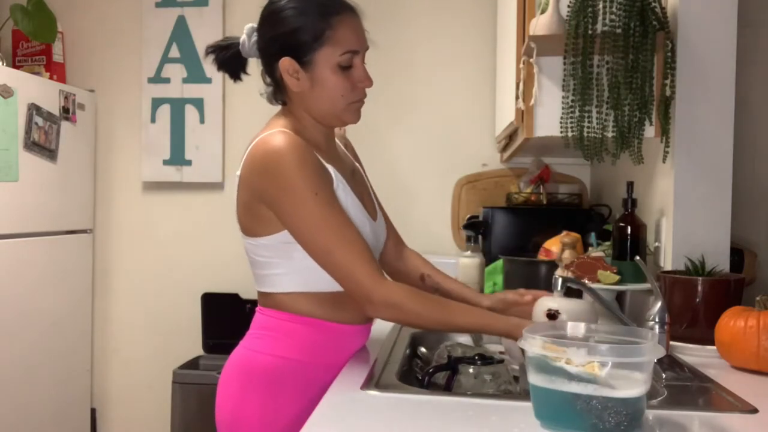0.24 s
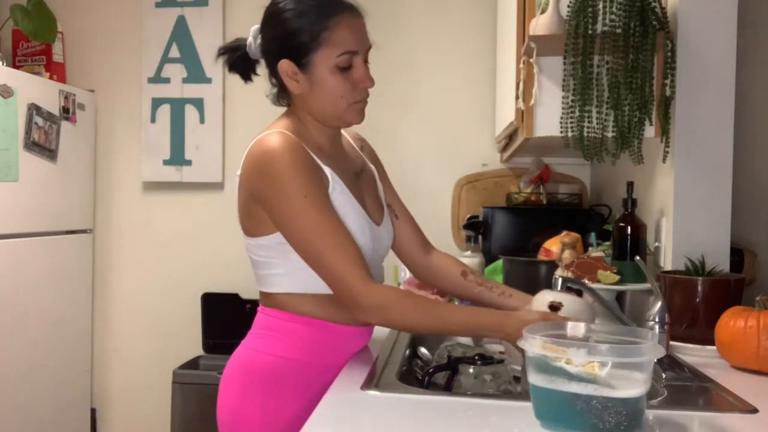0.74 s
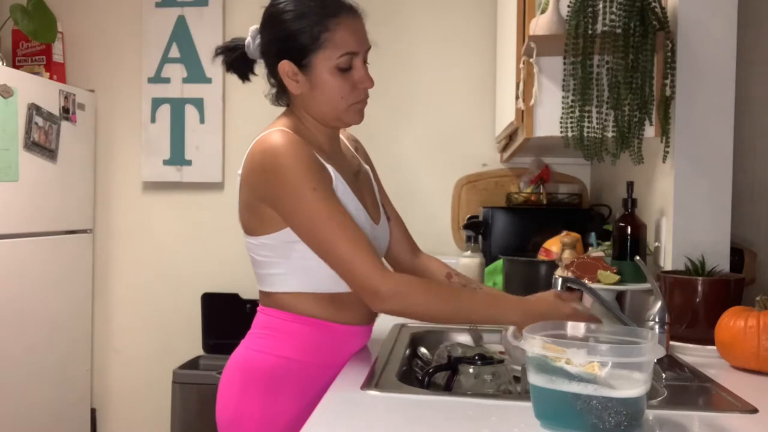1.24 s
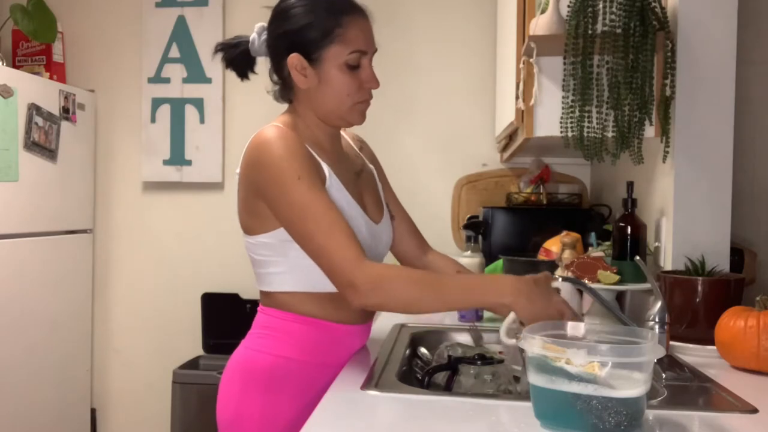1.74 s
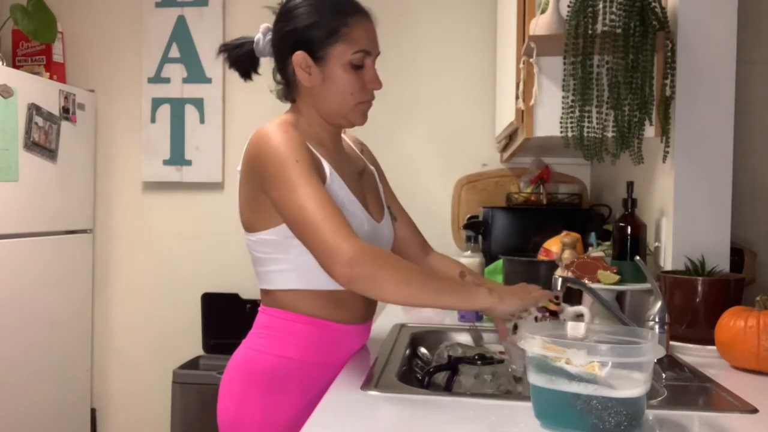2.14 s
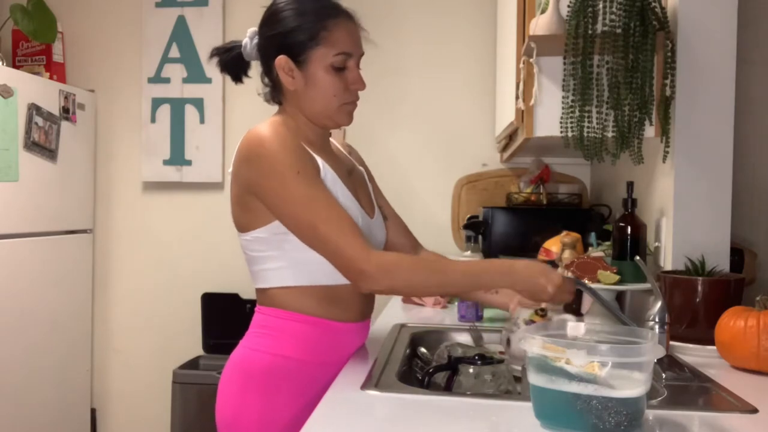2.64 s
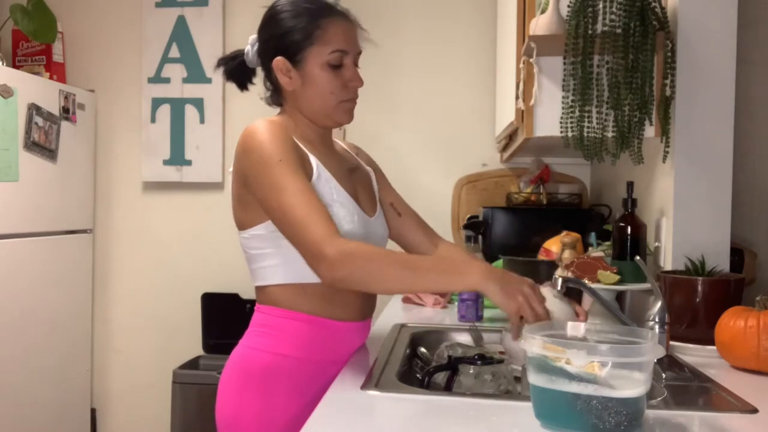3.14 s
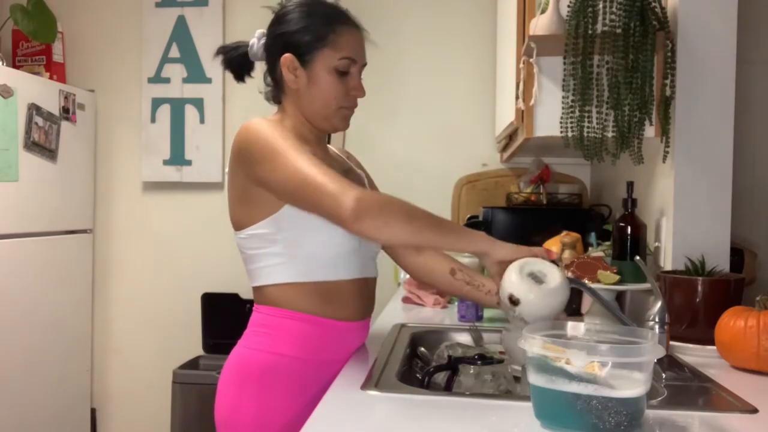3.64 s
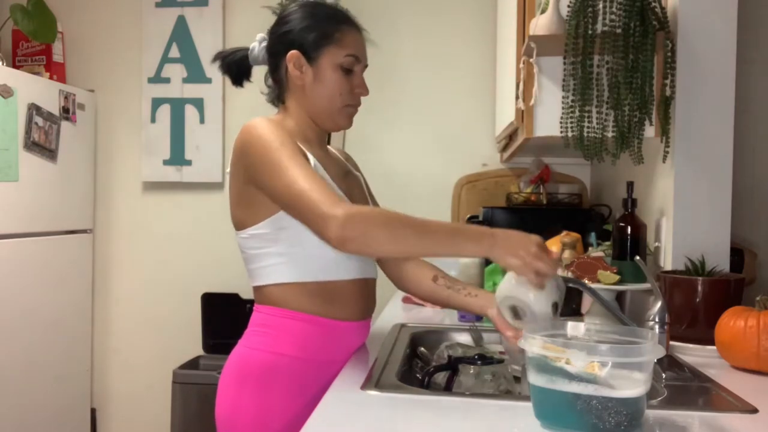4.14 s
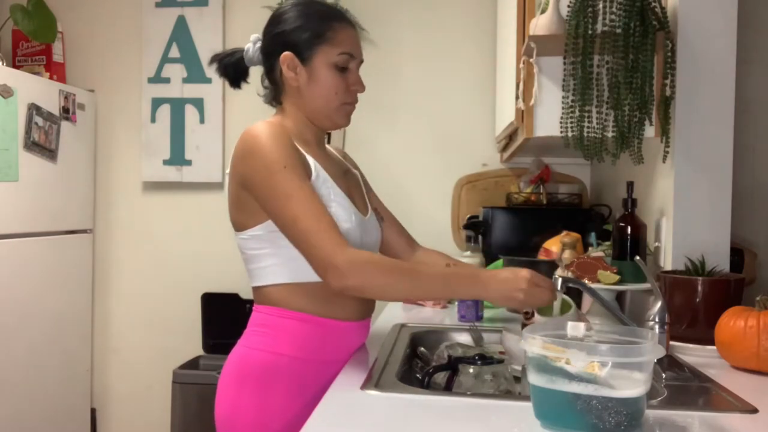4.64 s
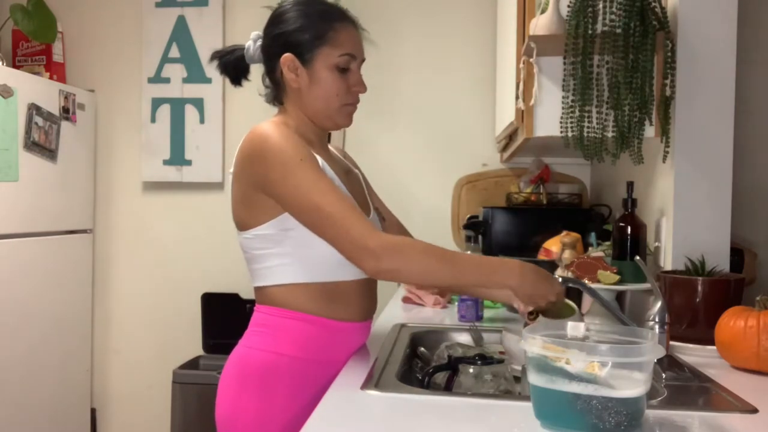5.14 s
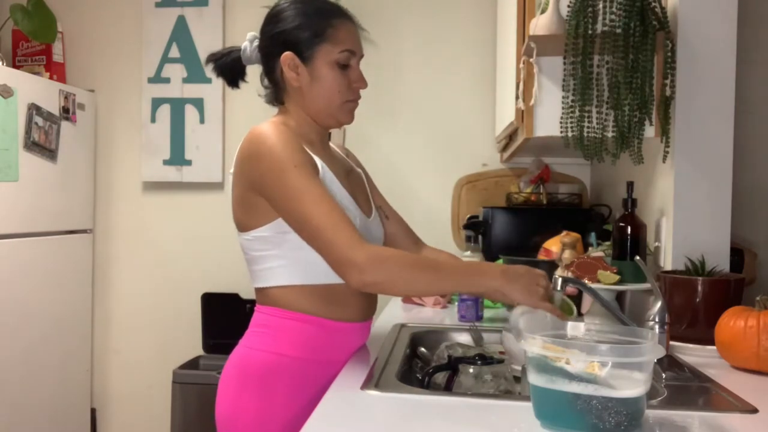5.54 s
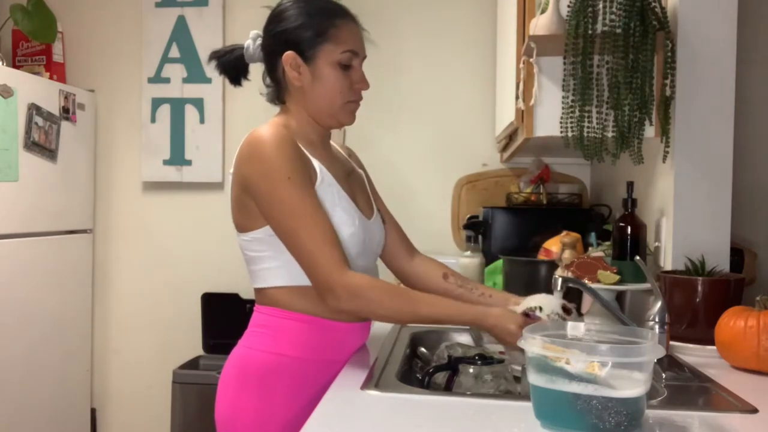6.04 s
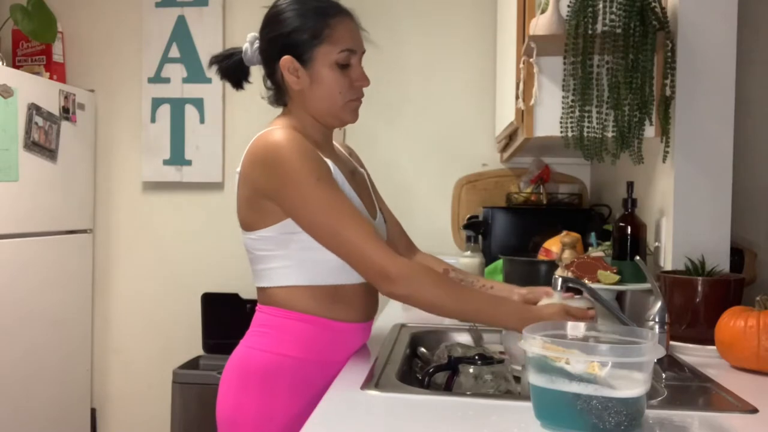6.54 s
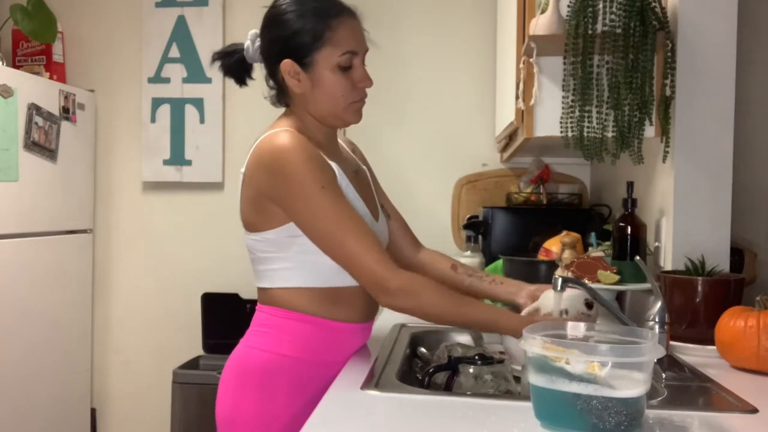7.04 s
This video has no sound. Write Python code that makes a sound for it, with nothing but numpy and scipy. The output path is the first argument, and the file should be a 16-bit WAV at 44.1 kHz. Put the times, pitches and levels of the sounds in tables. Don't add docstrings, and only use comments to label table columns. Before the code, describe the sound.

Someone washes ceramic dishes by hand at a steel sink in a small kitchen. Sharp clinks, a brief spoon ting and hollow thuds come at once and crowd the first three seconds, the loudest clink before two. A quiet gap holds soft water movement and tiny drips, then heavier knocks and washes return sparsely. A phone about two metres away picks up constant smooth hiss and short room echoes.

```python
import sys
import numpy as np
from scipy import signal
from scipy.fft import rfft, irfft
from scipy.io import wavfile
from scipy.ndimage import uniform_filter1d

SR = 44100
rng = np.random.default_rng(int(sys.argv[2]) if len(sys.argv) > 2 else 0)


def wav_out(sig):
    wavfile.write(sys.argv[1], SR, np.round(np.clip(np.atleast_2d(sig).T, -1, 1) * 32767).astype(np.int16))


def voltage_ratio(decibels):
    exponent = np.asarray(decibels, float) / 20
    return 10 ** exponent


N = 321489
FREQ = np.fft.rfftfreq(N, 1 / SR)
SCATTER_DB = 1.5


def band(x, hz, octaves):
    edges = np.clip(hz * 2 ** (np.array([-.5, .5]) * octaves), 20, .45 * SR)
    return signal.sosfilt(signal.butter(2, edges, "bandpass", fs=SR, output="sos"), x)


def add(out, x, s):
    i = max(int(s * SR), 0)
    out[i:i + len(x)] += x[:N - i]


def peak(x, db):
    return x * voltage_ratio(db) / np.abs(x).max()


def fade(t, t60):
    return np.exp(-np.log(1000) * t / t60)


def swell(s, rise, hold, t60):
    t = np.arange(N) / SR - s
    return np.clip(t / max(rise, .002), 0, 1) ** 2 * fade(np.maximum(t - rise - hold, 0), t60)


def rattle(chance, t, contact):
    ticks = np.exp(-t / max(contact, 2e-4)) * chance[0] * np.abs(chance[1])
    return ticks + 10.0 * (t == 0)


def ring(ticks, t, hz, db, t60, phase, choke=0):
    fed = np.convolve(ticks ** 2, np.hanning(M=40))[:len(t)] + 1e-18
    energy = np.array([signal.lfilter([1], [1, -fade(2 / SR, decay)], fed) for decay in t60])
    uneven_db = np.array([np.roll(choke, shift=1500 * k) for k in range(len(hz))]).reshape(len(hz), -1)
    slip = 0.18 * uneven_db
    wave = np.sin(2 * np.pi * hz[:, None] * t + phase[:len(hz), None] + slip)
    return (voltage_ratio(db[:, None] + uneven_db) * np.sqrt(energy) * wave).sum(0)


def struck(hits, families, contact, crack_hz, crack_octaves, crack_t60, scatter_db, ring_db=0):
    out, t = np.zeros(N), np.arange(SR // 2) / SR
    grip_s = .2
    for s, db, second_db, crack_db, damping in hits:
        chance = rng.standard_normal((4, len(t)))
        ticks = rattle(chance, t, contact)
        clatter = signal.fftconvolve(ticks, chance[3] * fade(t, crack_t60))[:len(t)]
        sound = peak(band(clatter, crack_hz, crack_octaves), db + crack_db)
        choke = 40 * np.clip(damping, .5, 1.6) * uniform_filter1d(chance[1], size=256)
        for modes, family_db in zip(families, (db + ring_db, db + ring_db + second_db)):
            hz, mode_db, t60 = np.array(modes).T
            spot_db = scatter_db * chance[2, :len(hz)]
            decay = t60 / max(damping, .2)
            tone = ring(ticks, t, hz, mode_db + spot_db, decay, 3 * chance[3], choke)
            sound = sound + peak(tone, family_db)
        add(out, sound * np.exp(-(t / grip_s) ** 4), s)
    return out


def hiss():
    # (frequency [Hz], level [dB per Hz], likeness of left and right [0-1])
    spectrum = [(30, -105, 1), (60, -112, 0), (170, -90, 0.25), (257, -92, 0.8), (610, -96.5, 0.2),
                (1270, -93, 0.56), (2540, -91, 0.62), (4320, -91.5, 0.02), (6800, -93.5, 1),
                (9350, -84.5, 0), (9800, -90, 0), (13400, -87.5, 0.2), (17700, -95.5, 0.8)]
    # (frequency [Hz], width [Hz], level over the hiss [dB])
    whine = [(1507, 2.1, 18), (2260, 2.9, 15)]
    hz, db, alike = np.transpose(spectrum)
    db, alike = (np.interp(np.log(FREQ + 1), np.log(hz), c) for c in (db, np.clip(alike, 0, 1)))
    db = db + sum(lift_db / (1 + ((FREQ - f) / width) ** 2) for f, width, lift_db in whine)
    mid, side = rfft(rng.standard_normal((2, N)))
    mid, side = mid * np.sqrt((1 + alike) / 2), side * np.sqrt((1 - alike) / 2)
    both = np.array([mid + side, mid - side]) * voltage_ratio(db) * np.sqrt(SR / 2)
    house = 1 / (1 + (FREQ / 900) ** 2)
    drift = uniform_filter1d(uniform_filter1d(rng.standard_normal(N), size=5000), size=5000)
    drift_db = 3.5 * drift / drift.std()
    return irfft(both * (1 - house), N) + irfft(both * house, N) * voltage_ratio(drift_db)


def counter():
    # (time [s], level [dB], hold [s])
    jolts = [(0, -44, .01), (0.152, -62, 0.17), (0.402, -43, 0.17), (1.557, -49, 0.24), (2.087, -48, 0.076),
             (2.412, -41, 0.046), (2.646, -51, 0.15), (2.89, -49.5, .04), (4.27, -79, .08),
             (4.7, -39.5, 0.021), (5.03, -46, 0.054), (5.335, -44.5, 0.023), (5.844, -48.5, 0.28),
             (6.317, -51, 0.064), (6.806, -55.5, 0.07), (6.97, -56, 0.034)]
    rise_s, t60_s, rest_db = 0.017, 0.43, -70
    low = band(band(rng.standard_normal(N), 61.6, 0.59), 61.6, 0.59)
    low = low + 0.34 * band(rng.standard_normal(N), 108.4, 1.0)
    shake = sum(voltage_ratio(db) * swell(s, rise_s, hold, t60_s) for s, db, hold in jolts)
    return low / low.std() * (shake + voltage_ratio(rest_db))


def sheet_steel(thuds, knock_hz, contact, booms):
    out, t = np.zeros(N), np.arange(SR // 3) / SR
    hz, mode_db, t60 = np.array(booms).T
    crowd = np.geomspace(420, 3600, num=64)
    for s, db, knock_db, damping in thuds:
        chance = rng.standard_normal((5, len(t)))
        ticks, damping = rattle(chance, t, contact), max(damping, .2)
        push = np.convolve(np.abs(ticks), np.hanning(M=220))[:len(t)]
        boom_hz = hz * (1 + 0.0342 * chance[4, :len(hz)])
        boom_db = mode_db + 1.2 * chance[2, :len(hz)]
        boom = ring(push, t, boom_hz, boom_db, t60 / damping, 3 * chance[0])
        near = crowd * (1 + 0.0277 * chance[3, :len(crowd)])
        away = np.abs(np.log2(near / knock_hz))
        focus = -2.0 + 1.2 * max(knock_db, 0)
        crowd_db = -24 * np.tanh(0.082 * away) - focus * away + 3 * chance[4, -len(crowd):]
        knock = ring(ticks, t, near, crowd_db, 0.3 * (800 / near) / damping, 3 * chance[2])
        chatter = voltage_ratio(47.6 * uniform_filter1d(chance[1], size=256))
        thud = peak(boom, db) + peak(chatter * knock, db + knock_db)
        add(out, thud * np.cos(1.5 * np.pi * t), s)
    return out


def basin():
    # (time [s], boom peak [dB], knock re boom [dB], damping by the load [1])
    wall = [(.001, -31.5, 10, 1.5), (.404, -23.5, 8.5, 3.2), (.428, -23.5, 2.5, 2.7),
            (.467, -32.5, 8.5, 0.85), (.6, -39.5, 2, 1.9), (1.687, -33.5, 1, 0.95), (1.74, -35, 9.5, 1.4),
            (2.041, -43, 10.5, 0.28), (2.101, -37, 11, 0.87), (2.206, -38, 11.5, 3.7),
            (2.358, -47, 8.5, 0.18), (2.459, -34, 8, 1.7), (2.659, -37.5, 14.5, 1.3),
            (2.679, -34, 2.5, 0.82), (2.815, -40, 10.5, 5.2), (2.889, -42, 3.5, 0.71),
            (5.8385, -36.5, 7.5, 1.65), (5.879, -38, 2.5, 0.36), (5.961, -38.5, 5, 1), (6.399, -47.5, 3, 4)]
    # (time [s], boom peak [dB], knock re boom [dB], damping by the load [1])
    edge = [
        (.04, -34, 11.5, 3.3),
        (.089, -40.5, 10, 0.83),
        (.17, -40.5, 11.5, .68),
        (.689, -48, 1, 0.92),
        (1.26, -47, 8.5, 0.16),
        (1.351, -43, 6, 0.57),
        (2.331, -50, 16.5, 2.2),
    ]
    # (time [s], boom peak [dB], knock re boom [dB], damping by the load [1])
    deep = [
        (1.591, -24.5, -7, 1.3),
        (6.311, -27, -16.5, 1.8),
    ]
    # (time [s], boom peak [dB], knock re boom [dB], damping by the load [1])
    floor = [(2.416, -30.5, 7, 3.8), (2.579, -42, 8, 0.99), (2.779, -44, 11, 0.75), (4.678, -28, 4.5, 1.8),
             (4.916, -46.5, 7, 1.1), (5.043, -36.5, 5, 1.9), (5.09, -37.5, 4, 1.17),
             (5.319, -37.5, 7, 0.97), (6.048, -44, 3, 1.7), (6.791, -36, 6, 2.2), (6.96, -38, -20, 3),
             (7.065, -43, 1, 2.5)]
    # (frequency [Hz], level [dB], t60 [s])
    booms = [(60.5, -27, 0.27), (103, -2.5, 0.73), (164.2, 0, 0.45), (201.2, -9, 1), (244.2, 3, 0.33),
             (264.3, 2.5, 0.55), (298.6, 5, 0.12), (363.5, -1.5, 0.58), (438.4, -4.5, 0.38)]
    # (frequency [Hz], level [dB], t60 [s])
    deep_booms = [(168, -3.5, 0.16), (209.6, -0.5, 0.12), (250, -4, 0.27), (309, -10, 0.13)]
    out = sheet_steel(wall, 1120, 0.0038, booms) + sheet_steel(edge, 1290, 0.0021, booms)
    return out + sheet_steel(deep, 750, 0.01, deep_booms) + sheet_steel(floor, 750, 0.01, booms)


def cup():
    # (time [s], first family peak [dB], second re first [dB], clatter re first [dB], damping by the grip [1])
    hits = [(.0014, -28.5, 7, 14.5, 0.8), (.403, -19, -31, -5, 1.6), (.6855, -17.5, -38, -13.5, 2.1),
            (.8965, -27.5, -27, -17, 1.5), (1.0965, -21, -10, -13, 1.2), (1.3496, -24.5, -5.5, -28, 2.5),
            (1.602, -23.5, -7.5, -18, 0.53), (1.6824, -29, -6, -16, 0.42), (1.7349, -20, -6, 5.5, 1.6),
            (2.0992, -30, -6, -10, 0.81), (2.4593, -48, 14, -8, 4.3), (4.6807, -50, -14, -18, 1),
            (4.915, -39.5, -5, -2.5, 3.8), (7.0346, -45.5, -6, -16, 0.96)]
    # (frequency [Hz], level [dB], t60 [s])
    families = ([(1780, 0, .075), (1814, -15, .2), (1739, -17, .17), (1850, -19, .17)], [(1900, -2, .15),
                (1950, 0, .15), (2015, -3, .2), (2121, -7, .2), (3822, -9, .2), (4813, -9, .2)])
    return struck(hits, families, 0.0038, crack_hz=2760, crack_octaves=1.47, crack_t60=0.046, scatter_db=6.0)


def spoon():
    # (time [s], first family peak [dB], second re first [dB], clatter re first [dB], damping by the grip [1])
    hits = [
        (.0014, -32, -2, -11, 2.2),
        (.0611, -39.5, 0, 11, 2.4),
    ]
    # (frequency [Hz], level [dB], t60 [s])
    families = [(4530, 0, .35)], [(5600, -2, .25), (6750, 0, .25)]
    return struck(hits, families, 0.0023, crack_hz=2720, crack_octaves=0.94, crack_t60=0.44, scatter_db=SCATTER_DB)


def pot():
    # (time [s], first family peak [dB], second re first [dB], clatter re first [dB], damping by the grip [1])
    taps = [(.0014, -36, -1, 4.5, 0.96), (.16, -41.5, 8.5, 10.5, 0.62), (.4274, -28, 1, -25, 3.9),
            (.547, -29.5, -1, -5, 1.4), (.5781, -36.5, 10, -12, 2.5), (.7104, -39.5, 8, -1, 11),
            (.8984, -41.5, 0.5, 1, 1.6), (1.262, -31, 3, -1.5, 5.7), (1.3488, -31, -3, -1.5, 1.5),
            (1.7585, -25.5, 0, -2.5, 2.1), (2.0916, -38.5, 13.5, 13, 1.52), (2.4574, -41, 9.5, -1, 8.1),
            (2.603, -52, 9, 14, 1.5), (5.9624, -45, 10.5, 10, 1.5)]
    # (time [s], first family peak [dB], second re first [dB], clatter re first [dB], damping by grip [1])
    scrapes = [(.2132, -36, 0, 0, 1.8), (.411, -21.5, -8.5, -5.5, 2.6), (1.1074, -37.5, 4, 2.5, 5.2),
               (1.6167, -34, -2, -2, 1.1), (1.6839, -26.5, -1.5, 1.5, 2), (2.0349, -41, 6.5, 2, 3.2),
               (2.367, -46.5, 6, 3, 0.81), (2.5692, -46, -5, 5, 2.2), (2.7804, -46, 5, 9, 1.8),
               (2.9408, -50, -2, 5, 3), (4.6775, -33, -5, -4, 1.6), (5.0538, -47.5, 0, -2, 1.7),
               (5.276, -43.5, 1, 2, 1.2), (5.3325, -37, 4.5, 1.5, 1.6), (5.975, -37, -22, -26, 1.3)]
    # (frequency [Hz], level [dB], t60 [s])
    families = ([(2764, 0, .34), (2785, -5, .3), (1055, -18, .2)], [(2877, 0, .27), (2935, -3, .25),
                (2975, -7, .2), (3052, -6, .22), (3106, -6, .2), (3278, -10, .2), (12600, -20, .12)])
    out = 0
    for hits, contact in ((taps, .0035), (scrapes, .011)):
        out += struck(hits, families, contact, crack_hz=3080, crack_octaves=4.2, crack_t60=0.25,
                      scatter_db=10.0, ring_db=4.5)
    return out


def lip_and_panel():
    # (time [s], first family peak [dB], second re first [dB], clatter re first [dB], damping by the load [1])
    lip_hits = [
        (.16, -42, 8, 12, 1.4),
        (.6, -35.5, -15, -20, 1.6),
        (1.698, -35.5, -18, -22, 0.56),
        (5.8385, -26, 6, -5.5, 1.2),
        (5.846, -34.5, 11, -11, 1.2),
        (5.875, -49, -2, 11, 1.3),
        (5.887, -35, 0, 7, 1.6),
    ]
    # (frequency [Hz], level [dB], t60 [s])
    lip = [(1071, 0, .26)], [(1211, 0, .05), (1287, -16, .2), (1650, -12, .1)]
    # (time [s], first family peak [dB], second re first [dB], clatter re first [dB], damping by load [1])
    panel_hits = [(.405, -22, -2, -21, 0.95), (2.208, -47, -2, 3, 1.8), (2.417, -32, -0.5, -7, 1.9),
                  (2.461, -37, 8.5, 0, 2), (2.659, -28, 11, 10, 1.43), (2.683, -24.5, 2, -13, 1.34),
                  (4.063, -63, 14, -5, 2.1), (4.082, -66, 15, -5, 3), (4.33, -52, -10, -10, 2),
                  (4.368, -51, -5, -8, 2), (4.679, -28.5, 0, -20, 1.03), (5.041, -39.5, 0.5, 0, 1.8),
                  (5.265, -41, -10, -20, 1.3), (5.32, -35.5, -1.5, -22, 0.67),
                  (5.846, -33.5, 10.5, -15, 1.14)]
    # (frequency [Hz], level [dB], t60 [s])
    panel = [(436, -8, .2), (549, -5, .2), (700, 0, .16)], [(825, -8, .15), (877, 0, .15), (980, -6, .25)]
    out = 0
    for hits, part in ((lip_hits, lip), (panel_hits, panel)):
        out += struck(hits, part, 0.00072, crack_hz=1300, crack_octaves=2.0, crack_t60=0.012, scatter_db=SCATTER_DB)
    return out


def rim():
    # (time [s], first family peak [dB], second re first [dB], clatter re first [dB], damping by the grip [1])
    hits = [
        (.179, -33.5, -25, -20, 3.1),
        (.428, -33, -24, -27, 1.6),
        (.5515, -38, 2, -19, 0.97),
        (1.6182, -37, -1.5, -20, 2.3),
        (2.039, -42.5, -3, -22, 2.9),
        (2.7891, -41.5, -1, 6.5, 4.2),
        (5.2869, -44, -5, -21, 0.62),
        (5.9618, -41, -22, -20, 1.1),
    ]
    # (frequency [Hz], level [dB], t60 [s])
    families = [(4274, 0, .25)], [(7284, 0, .18), (6450, -6, .12)]
    return struck(hits, families, 0.0037, crack_hz=4000, crack_octaves=2.4, crack_t60=0.043, scatter_db=SCATTER_DB)


def slosh():
    # (time [s], peak [dB], treble re peak [dB], swell [s], t60 [s])
    sloshes = [
        (0.383, -44.5, 10, 0.0057, 0.086),
        (2.04, -37, -2.5, 0.068, 0.77),
        (2.33, -42, -0.5, 0.055, 0.77),
        (3.878, -55, 8.5, 0.0029, 0.11),
        (5.815, -40.5, -2.5, 0.02, 0.46),
        (6.24, -44.5, -17, 0.031, 0.15),
        (4.239, -43, -10.5, 0.052, 0.69),
        (5.218, -33, -8, 0.055, 0.33),
        (6.939, -38.5, -14, 0.0077, 0.088),
        (6.99, -51.5, -16, 0.03, 0.97),
    ]
    bubbles_per_s, bubble_db, bubble_t60_s, grain_db = 90, -4, .035, 6.5
    chance = rng.standard_normal((4, N))
    low = band(chance[0] * voltage_ratio(1.7 * uniform_filter1d(chance[1], 90) * np.sqrt(90)), 400, 3.04)
    high = band(chance[2] * voltage_ratio(grain_db * uniform_filter1d(chance[3], 60) * np.sqrt(60)), 2880, 0.54)
    froth, t = np.zeros(N), np.arange(SR // 16) / SR
    for when, size, strength in rng.random(size=(2000, 3)):
        hz = 350 * 5.95 ** size
        bubble = np.sin(2 * np.pi * hz * (t + 6 * t ** 2)) * fade(t, bubble_t60_s)
        add(froth, strength ** 3 * bubble, when * 2000 / bubbles_per_s % (N / SR))
    low = low / low.std() + voltage_ratio(bubble_db) * froth / froth.std()
    high = high / high.std()
    return sum(voltage_ratio(db) * swell(s, rise, 0.029, t60) * (low + voltage_ratio(treble_db) * high)
               for s, db, treble_db, rise, t60 in sloshes)


def lid():
    # (time [s], first family peak [dB], second re first [dB], clatter re first [dB], damping by the grip [1])
    hits = [
        (1.6044, -24, -30, -7, 1.5),
        (1.736, -13, -12, -8, 1.6),
        (2.0911, -24.5, -20, -4, 6),
        (2.3704, -39, .6, 2, 1.23),
        (2.603, -26, -14, -12, 1.5),
    ]
    # (frequency [Hz], level [dB], t60 [s])
    families = ([(2438, 0, .24), (2398, -6, .2)], [(3774, -6, .25), (3990, -3, .22), (4759, -8, .25),
                (4867, -3, .25), (5525, -2, .22), (6017, 0, .3), (6400, -5, .1)])
    return struck(hits, families, 0.00078, crack_hz=6400, crack_octaves=3.4, crack_t60=0.053, scatter_db=SCATTER_DB)


def lid_top_and_plate():
    # (time [s], first family peak [dB], second re first [dB], clatter re first [dB], damping by the
    shine_hits = [
        (1.736, -22, -18, -25, 1),
        (2.0925, -36, -8, -20, 1.5),
        (2.603, -31, 1, -25, 1.2),
    ]
    # (frequency [Hz], level [dB], t60 [s])
    shine = [(6025, 0, .28), (5525, -2, .18)], [(3930, 0, .35), (4834, -5, .4), (3440, -10, .12)]
    # (time [s], first family peak [dB], second re first [dB], clatter re first [dB], damping by the grip [1])
    plate_hits = [
        (3.885, -54, -9, 2, 2.2),
        (3.905, -45, -16, -5, 2.5),
        (4.679, -32, -11.5, -34, 1.1),
    ]
    # (frequency [Hz], level [dB], t60 [s])
    plate = [(1868, 0, .3)], [(3903, 0, .2)]
    out = 0
    for hits, dish in ((shine_hits, shine), (plate_hits, plate)):
        out += struck(hits, dish, .0015, crack_hz=5000, crack_octaves=1.7, crack_t60=.03, scatter_db=SCATTER_DB)
    return out


def drops():
    # (time [s], peak [dB], frequency [Hz])
    falls = [
        (3.247, -50.5, 548),
        (3.677, -50, 1600),
        (4.35, -51, 1340),
        (4.205, -52, 1360),
        (4.252, -48, 1830),
        (6.565, -52, 1034),
        (6.672, -45, 1270),
    ]
    out, t = np.zeros(N), np.arange(SR // 8) / SR
    for s, db, hz in falls:
        tone = np.sin(2 * np.pi * hz * (t + 1.24 * t ** 2))
        flutter = voltage_ratio(60 * uniform_filter1d(rng.standard_normal(len(t)), size=200))
        bubble = tone * fade(t, 0.11) * np.minimum(t / 0.0042, 1) * flutter
        add(out, voltage_ratio(db) * bubble, s)
    return out


def kitchen():
    # (frequency [Hz], t60 [s], level [dB])
    bands = [(127, 0.12, 6), (243, 0.43, -2), (686, 0.32, 2), (1600, 0.56, 3.5), (3320, 0.34, 6.5),
             (6800, 0.083, 7)]
    t = np.arange(int(.7 * SR)) / SR
    mid, side = rng.standard_normal((2, len(t)))
    echoes = 0
    for hz, t60, db in bands:
        spread = min(hz / 600, 1) * side * np.array([[1.22], [-1.12]])
        tail = band(mid + spread, hz, 1.382) * fade(t, t60)
        echoes = echoes + voltage_ratio(db) * tail * np.sqrt(2 * np.log(1000) / t60 / SR)
    arrival = np.clip((t - .003) / 0.0025, 0, 1)
    for _ in range(4):
        response = rfft(echoes * arrival)
        even = np.sqrt(uniform_filter1d(np.abs(response) ** 2, size=150, axis=1))
        echoes = irfft(response * np.sqrt(even / (np.abs(response) + 1e-9)), len(t)) * fade(t, 3.0)
    return echoes * arrival


def scene():
    air, shake = hiss(), counter()
    thuds = basin() + voltage_ratio(-9.5) * slosh() + drops()
    rings = voltage_ratio(2.5) * (cup() + spoon() + pot() + lip_and_panel() + rim() + lid() + lid_top_and_plate())
    sent = voltage_ratio(3) * thuds + voltage_ratio(-5) * rings
    wet = signal.fftconvolve(sent[None], kitchen(), axes=1)[:, :N]
    right = voltage_ratio(np.array([[-.8], [.8]]))
    return right * (voltage_ratio(-1) * (thuds + rings) + wet + shake) + air


def band_limit(x):
    return signal.sosfilt(signal.butter(12, 16680, fs=SR, output="sos"), x)


def record(dry):
    # (frequency [Hz], lead [rad])
    ports = [(0, 0), (950, -.4), (1290, -.3), (2450, -1.7), (2760, -2.8), (2900, -2.1), (3450, -2.1),
             (4220, -3.6), (6460, -5.2), (7600, -3.6), (8300, -3.14), (10200, -3.14), (12500, -.3),
             (13000, 0), (16300, 0)]
    # (frequency [Hz], sum [dB], difference [dB])
    kept = [(7500, 0, 0), (7800, -6, 0), (8300, -10, 0), (8600, -40, 0), (9500, -40, 0), (9800, -16, 0),
            (10300, -10, 0), (10900, 0, 0), (12300, 0, 0), (12500, 0, -8), (13000, 0, -12), (13200, 0, -40),
            (15800, 0, -40), (15900, -70, -70)]
    hz, lead = np.transpose(ports)
    turn = np.exp(.5j * np.interp(FREQ, hz, lead) * np.array([[1], [-1]]))
    bass_cut = signal.butter(2, 45, "highpass", fs=SR, output="sos")
    left, right = rfft(signal.sosfilt(bass_cut, dry)) * turn
    hz, sum_db, difference_db = np.transpose(kept)
    mid = (left + right) / 2 * voltage_ratio(np.interp(FREQ, hz, sum_db))
    side = (left - right) / 2 * voltage_ratio(np.interp(FREQ, hz, difference_db))
    mix = irfft(np.array([mid + side, mid - side]), N)
    return band_limit(mix)


dry = scene()
out = record(dry)
wav_out(out)
```